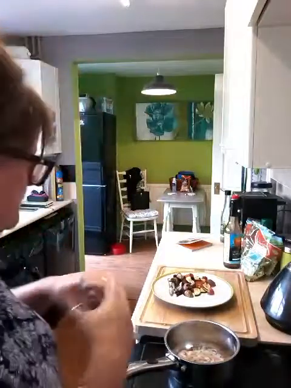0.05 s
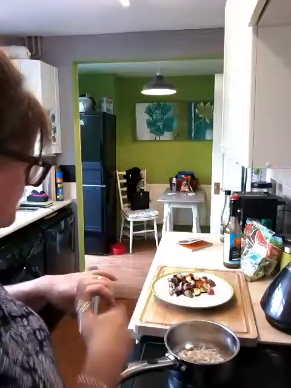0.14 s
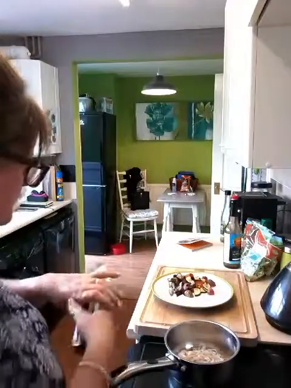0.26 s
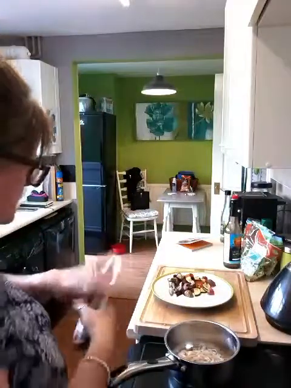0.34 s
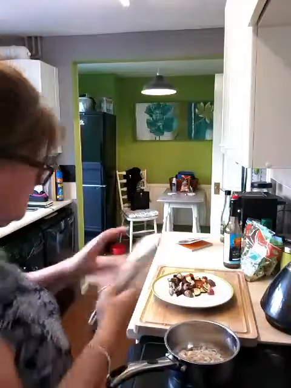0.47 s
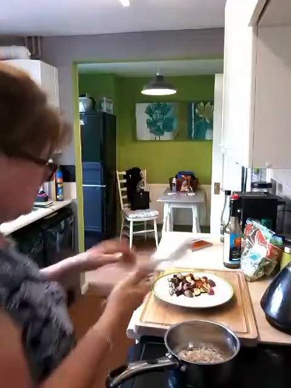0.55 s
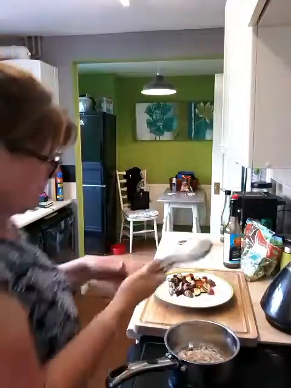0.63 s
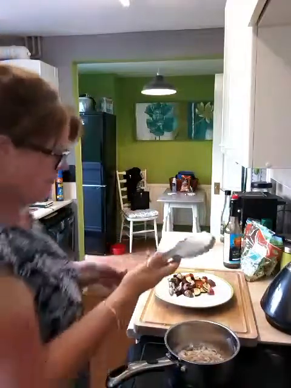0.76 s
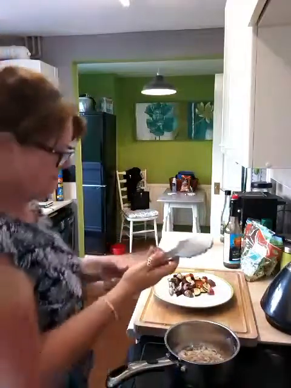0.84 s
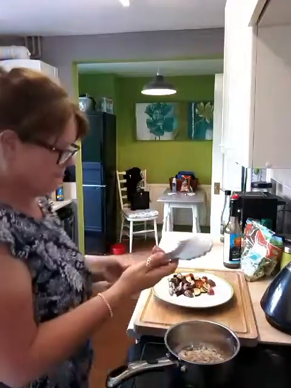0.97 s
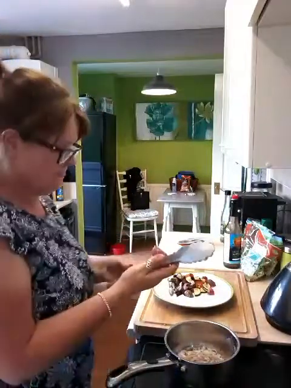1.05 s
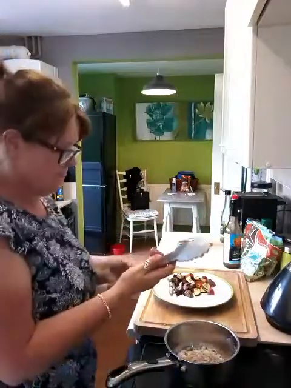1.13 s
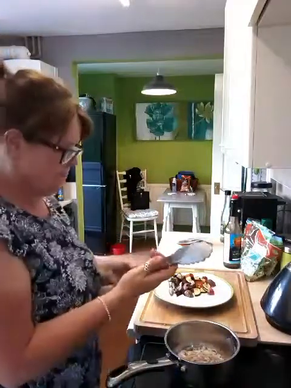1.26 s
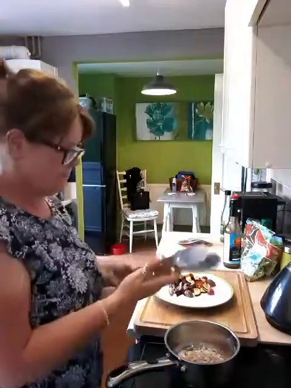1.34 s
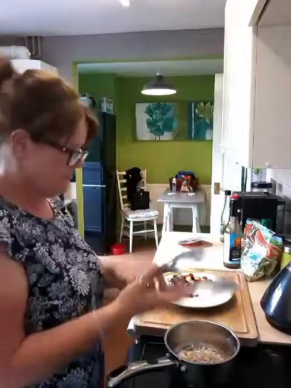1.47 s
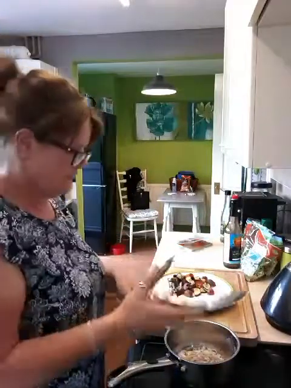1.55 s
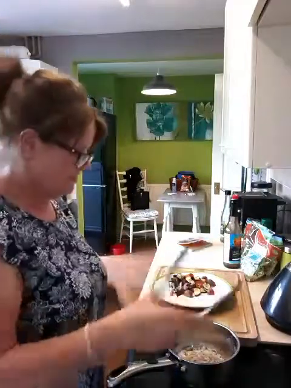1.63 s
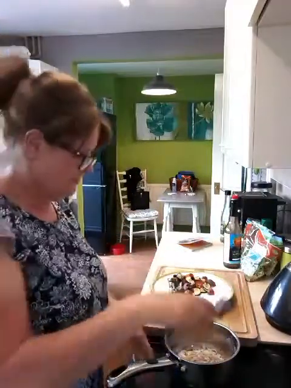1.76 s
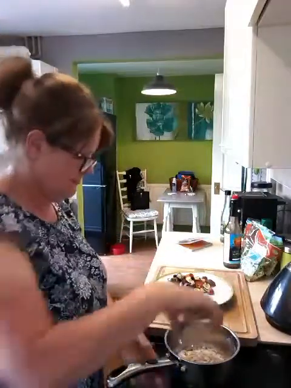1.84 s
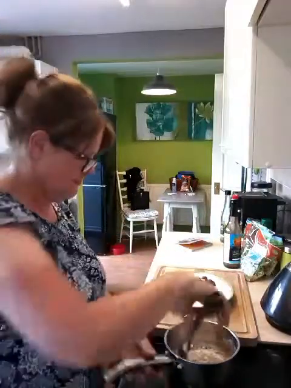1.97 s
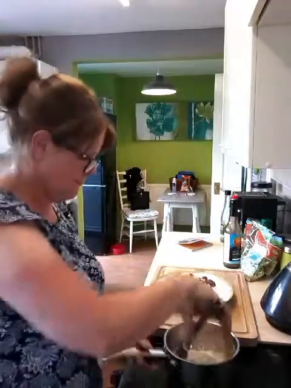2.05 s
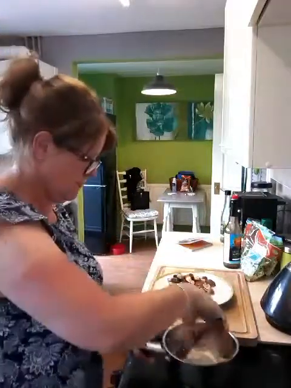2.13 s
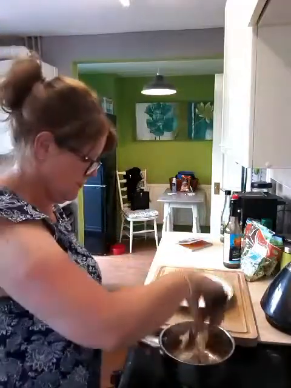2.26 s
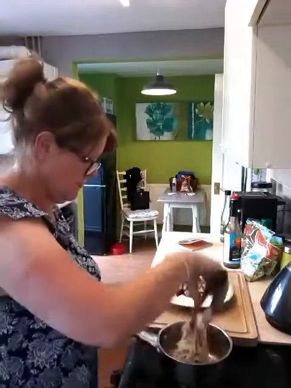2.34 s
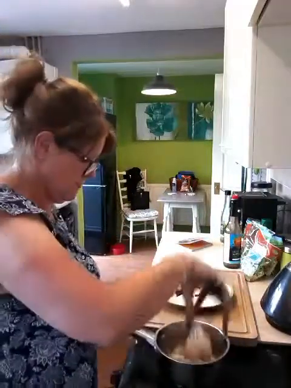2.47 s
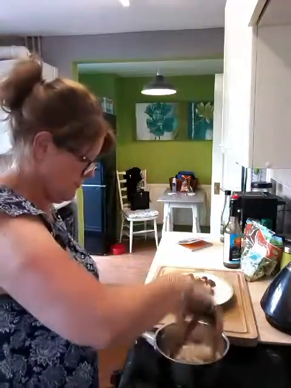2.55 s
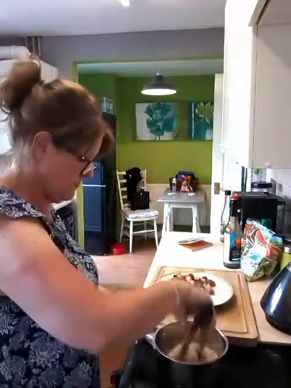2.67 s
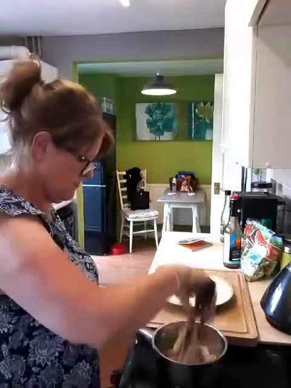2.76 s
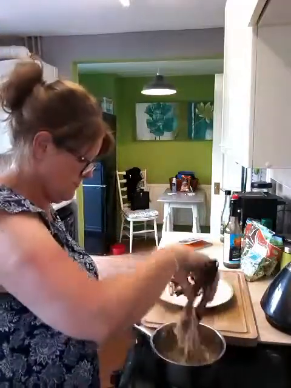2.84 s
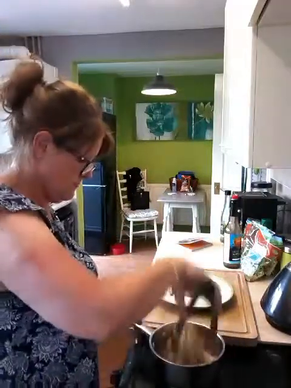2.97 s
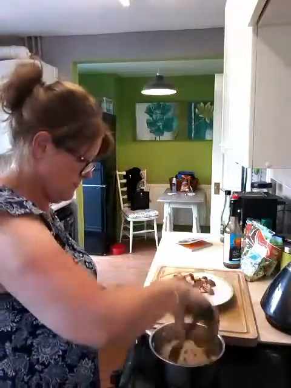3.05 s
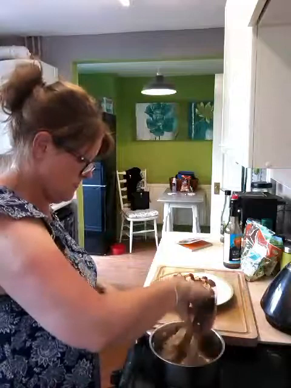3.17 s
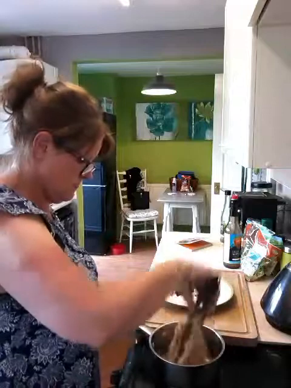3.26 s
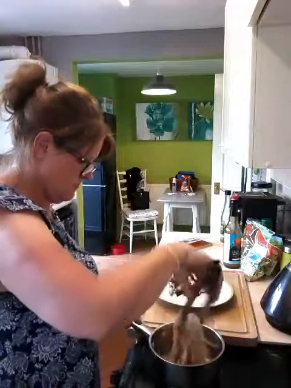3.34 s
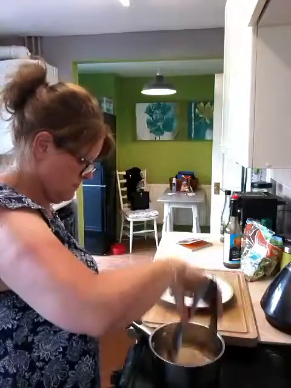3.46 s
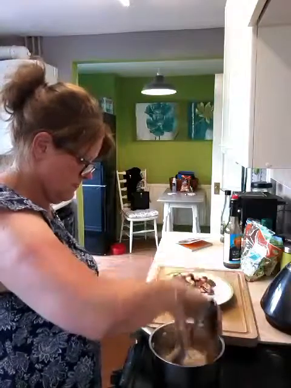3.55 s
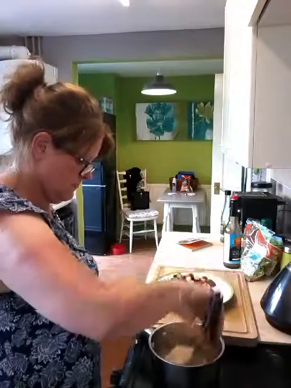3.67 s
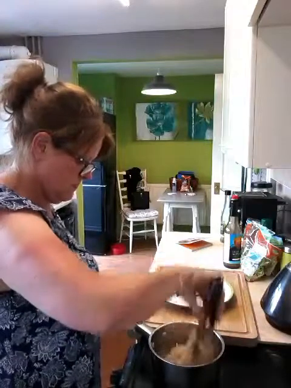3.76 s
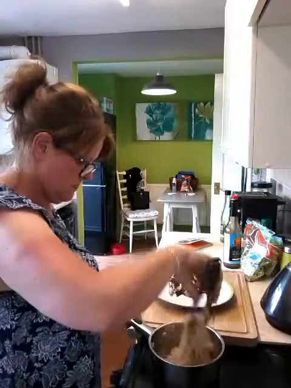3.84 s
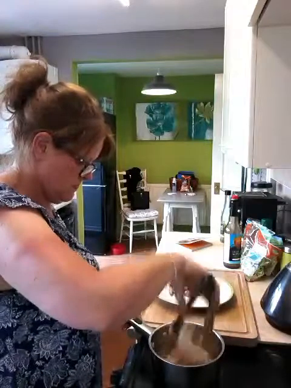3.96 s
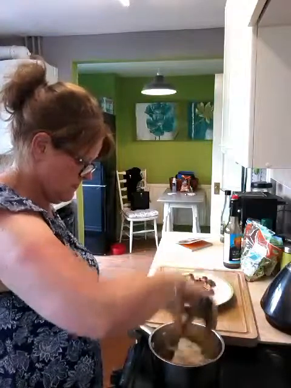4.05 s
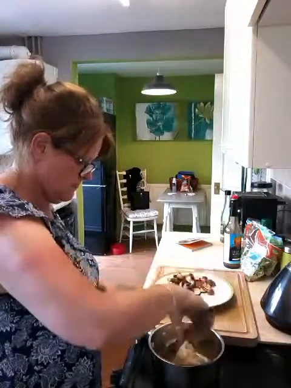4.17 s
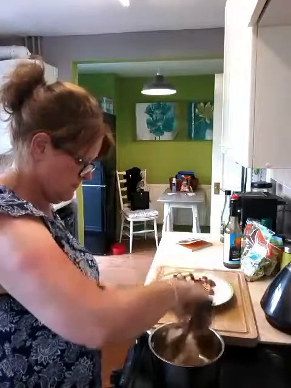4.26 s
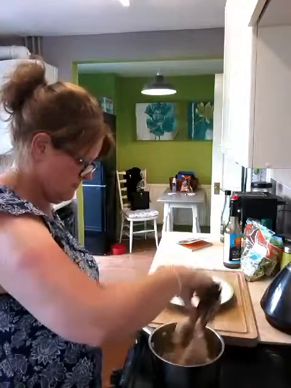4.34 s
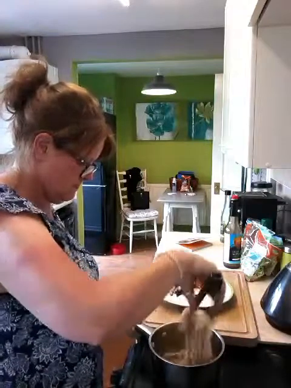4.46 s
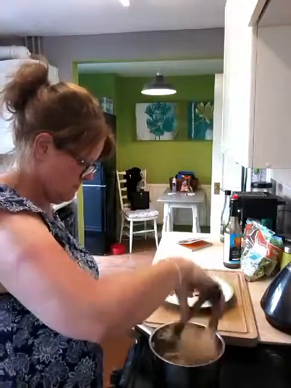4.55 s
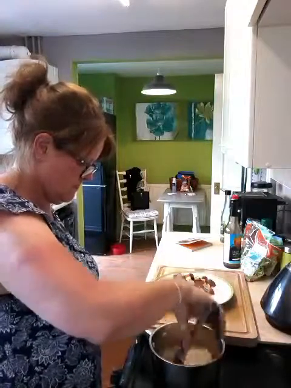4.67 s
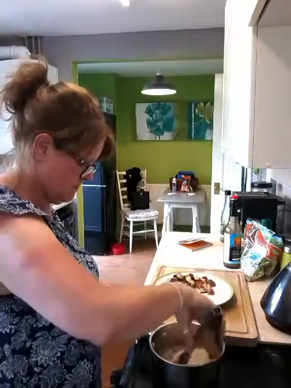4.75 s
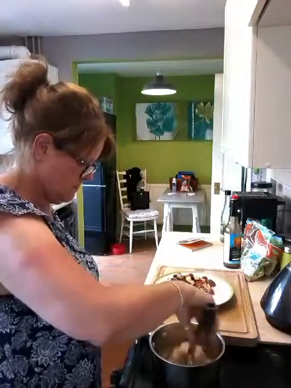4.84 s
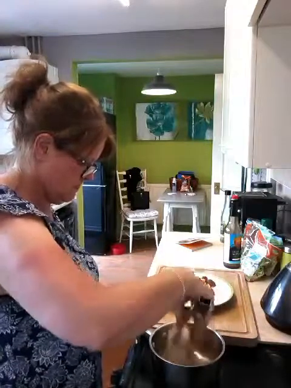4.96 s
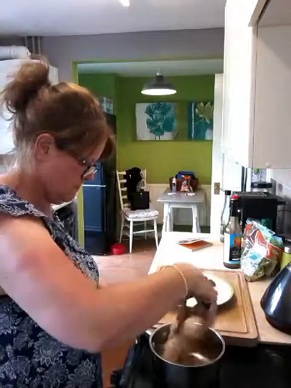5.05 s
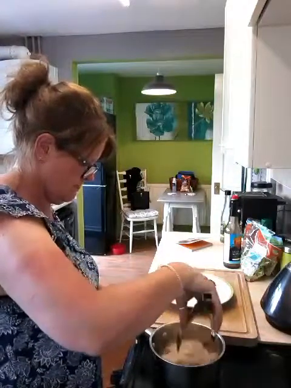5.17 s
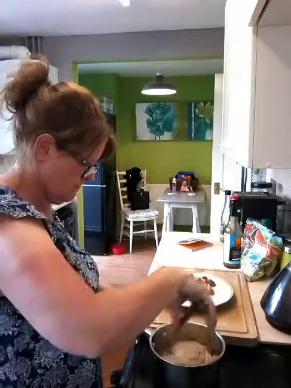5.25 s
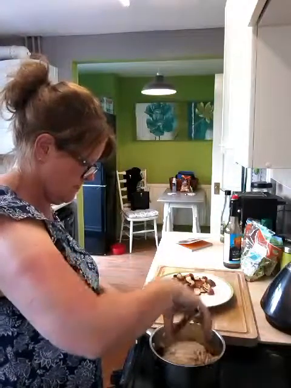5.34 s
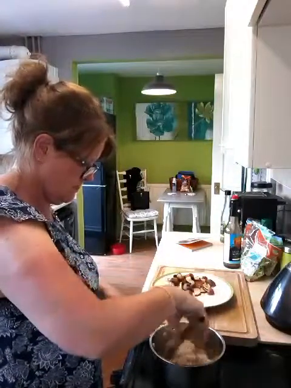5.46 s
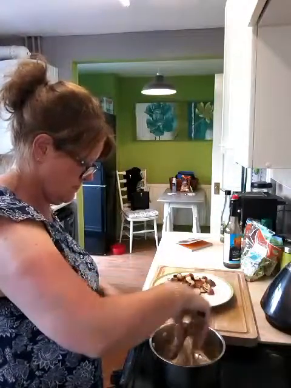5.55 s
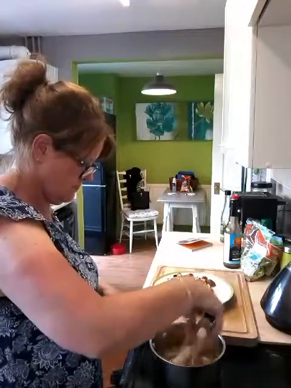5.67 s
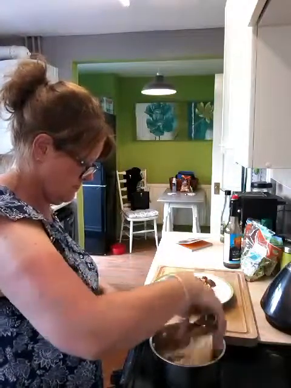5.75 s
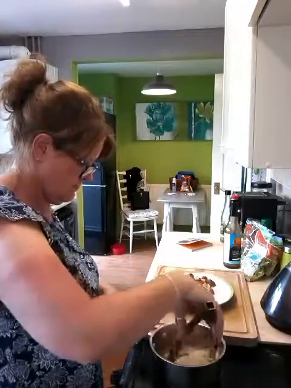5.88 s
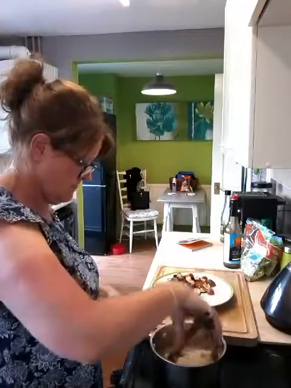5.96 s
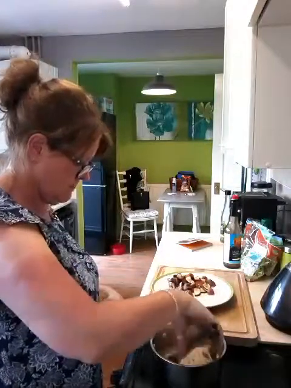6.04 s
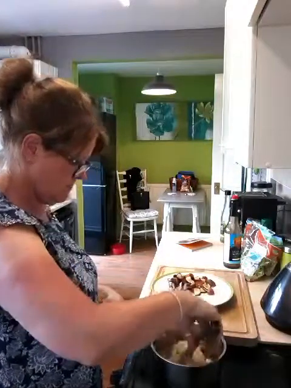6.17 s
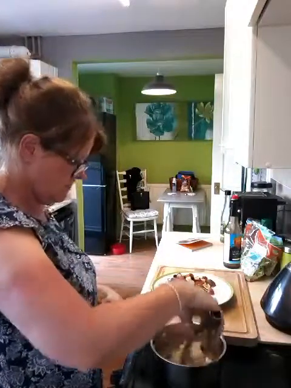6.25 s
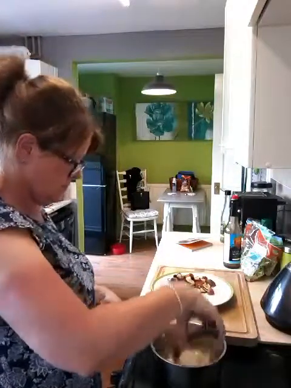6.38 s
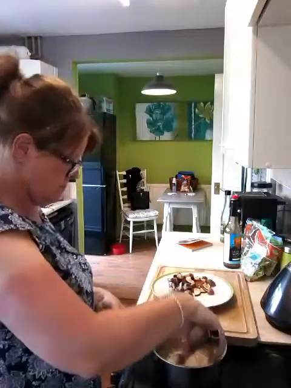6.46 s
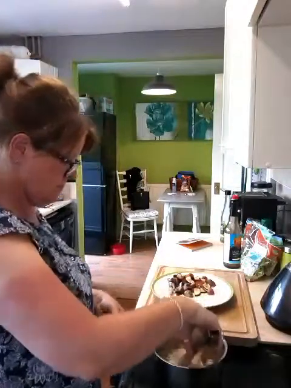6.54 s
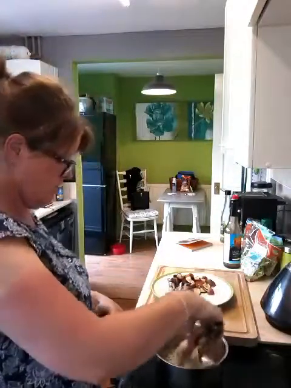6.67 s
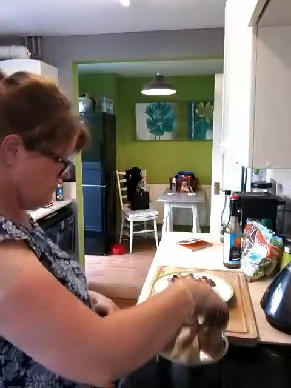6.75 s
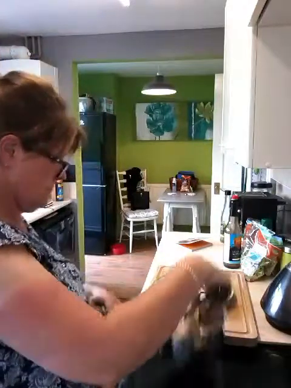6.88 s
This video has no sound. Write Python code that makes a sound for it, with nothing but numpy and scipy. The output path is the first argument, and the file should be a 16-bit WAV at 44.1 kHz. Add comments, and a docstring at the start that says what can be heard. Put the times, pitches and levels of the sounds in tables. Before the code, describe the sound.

A quiet, small, hard-surfaced kitchen is heard in mono from nearby, with still air and a barely audible low hum. From 0 to 1.9 seconds steel tongs are handled: a soft thud and tiny tick near 0.2, a clear springy click at 0.86, another pair around 1.13, fainter ticks later, and thin falling chirps. At 1.9 to 2.2 a wet crackle of noodles swells strongly and the tongs hit the saucepan with a bright clink and damped knock at 2.1. A tight clink-and-scrape cluster follows at 2.5 to 2.6, then single clinks near 3.1 and 4.1, with weak touches around 3.5. Several quick clinks come at 4.7, a ringing tap and light scrapes at 5.3 to 5.5, and faint chirps near 5.2. Another moist stir, soft bump and small scrape come at 6.0, then a final clink cluster at 6.4. Short echoes follow each touch.

```python
"""Steel tongs click in the hand, then clink, knock and scrape in a steel saucepan of wet noodles.
Each touch is a burst of tiny impacts that sets tongs, damped pan base and pan wall ringing.
The noodles are a crackle of tiny pops that swells with each stroke of the tongs; soft bumps are dull thuds.
A small hard kitchen answers with echoes, over still air, a faint mains hum and a few faint falling chirps."""
import sys
import numpy as np
from scipy import signal
from scipy.fft import rfft, irfft
from scipy.io import wavfile

SR = 44100
rng = np.random.default_rng(int(sys.argv[2]) if len(sys.argv) > 2 else 0)


def master_out(mix):
    """Clip the mix to full scale and print it as 16-bit PCM to the path in sys.argv[1]."""
    frames = np.transpose(np.atleast_2d(mix))
    ceiling = np.clip(frames, -1, 1)
    pcm = np.round(ceiling * 32767).astype(np.int16)
    wavfile.write(sys.argv[1], SR, pcm)


N = 304731
SIZE = 24000  # samples in one touch or echo pattern
BLOW = np.sqrt(0.02 * SR)  # turns an energy of one into a level of one held for 20 ms

# ringing of the pan wall: (pitch [Hz], relative level [dB], time to fall 60 dB [s])
WALL_RING = [(1912, 0, 0.17), (2010, -14, .05), (2100, -3, 0.06), (2020, -16, 0.085), (2363, -13, 0.09),
             (2400, -20, .07)]


def from_db(db):
    """Decibels to gain."""
    return 10 ** (np.asarray(db) / 20)


def unit(x):
    """Scale to an energy of one."""
    return x / np.sqrt(np.sum(x ** 2) + 1e-20)


def at_hz(points, hz):
    """Read a table between its points, along a log-frequency axis."""
    f, value = np.transpose(points)
    return np.interp(np.log(np.maximum(hz, 1)), np.log(f), value)


def colour(x, spectrum, size=4096):
    """Filter to the given spectrum, reacting as early as possible (minimum phase)."""
    hz = np.arange(size // 2 + 1) * SR / size
    cepstrum = irfft(np.log(from_db(at_hz(spectrum, hz))))
    # folding the second half onto the first puts the response after the impulse, never before
    cepstrum[1:size // 2] *= 2
    cepstrum[size // 2 + 1:] = 0
    response = irfft(np.exp(rfft(cepstrum)))
    return signal.fftconvolve(x, response)[:len(x)]


def dying(t60):
    """Envelope that falls 60 dB in t60 seconds."""
    return np.exp(-np.log(1000) * np.arange(SIZE) / SR / max(t60, 1e-4))


def add(out, s, sound):
    """Mix a sound in at a time in seconds."""
    i = max(round(s * SR), 0)
    out[i:i + len(sound)] += sound[:max(N - i, 0)]


def through(force, response):
    """A force drives a response; the result has an energy of one."""
    return unit(signal.fftconvolve(force, response)[:SIZE])


def ring(modes, scatter_db=3.0):
    """Decaying sines; each touch lands elsewhere and weights them anew."""
    out = np.zeros(SIZE)
    for hz, db, t60 in modes:
        length = min(int(max(t60, .005) * SR), SIZE)
        t = np.arange(length) / SR
        height = from_db(db + scatter_db * rng.standard_normal()) * rng.choice([-1, 1])
        decay = np.exp(-np.log(1000) * t / t60)
        out[:length] += height * decay * np.sin(2 * np.pi * hz * t)
    return unit(out)


def chatter(gap_s, rebound=0.63, count=5):
    """Metal on metal: each impact breaks into weaker rebounds (all-pass stages, so no colour is added)."""
    w = 2 * np.pi * np.arange(SIZE // 2 + 1) / SIZE  # radians per sample
    g = np.clip(rebound, .1, .85)
    gaps = gap_s * np.geomspace(.15, 1, count) * rng.uniform(.8, 1.2, count)
    force = 1
    for gap in gaps:
        delay = np.exp(-1j * w * max(round(gap * SR), 1))
        force = force * (delay - g) / (1 - g * delay)
    return irfft(force)


def diffuse_tail(build_s=0.0046):
    """Dense wall echoes build up quickly and die away, the lows lasting longest."""
    # how long echoes last: (frequency [Hz], time to fall 60 dB [s])
    echo_times = [(125, 0.62), (300, 0.38), (800, 0.38), (2000, 0.33), (6000, 0.3), (14000, .27)]
    white = rfft(rng.standard_normal(SIZE))
    hz = np.arange(SIZE // 2 + 1) * SR / SIZE
    tail = 0
    for centre, t60 in echo_times:
        # each band fades out where its neighbours fade in
        share = at_hz([(f, f == centre) for f, _ in echo_times], hz)
        tail = tail + irfft(white * share) * dying(t60)
    build = 1 - np.exp(-np.arange(SIZE) / SR / build_s)
    return unit(tail * build)


def kitchen(wet_db=0.5, near_db=-3.0, near_s=.005, walls_db=-5.0, walls_s=.04, count=8):
    """Echoes from one spot: direct sound, reflections off pan and worktop, single wall echoes, then the tail."""
    echoes = from_db(wet_db) * diffuse_tail()
    for db, spread_s in (near_db, near_s), (walls_db, walls_s):
        arrivals = (rng.uniform(.15, 1, count) * spread_s * SR).astype(int)
        echoes[arrivals] += from_db(db) * unit(rng.standard_normal(count))
    echoes[0] += 1
    return echoes


def background(floor_db=-66.5):
    """Still room air is coloured noise; an appliance hums at twice the mains rate and its octave."""
    # steady hum: (pitch [Hz], level [dB RMS])
    hum_tones = [(100, -70), (200, -87.5)]
    # colour of the room air: (frequency [Hz], relative level [dB per Hz])
    air_spectrum = [(12, -28.5), (20, -4), (48, -18), (70, -3.5), (113, -11), (234, -16), (698, -20.5),
                    (849, -18.5), (1000, -22), (1570, -24.5), (1860, -25), (3160, -25.5), (7520, -24),
                    (16000, -30)]
    t = np.arange(N) / SR
    hum = sum(from_db(db) * np.sqrt(2) * np.sin(2 * np.pi * hz * t) for hz, db in hum_tones)
    air = np.sqrt(N) * unit(colour(rng.standard_normal(N), air_spectrum))
    return hum + from_db(floor_db) * air


def stirring(attack_s=0.075, release_db_per_s=74):
    """Each stroke swells, holds while the tongs move and dies away as things settle; strokes add in power."""
    # strokes, sliding in the hand at first, then through noodles: (start [s], length [s], relative level [dB])
    strokes = [(-.02, 0.13, -58.5), (0.568, 0.33, -60), (1.023, 0.12, -54), (1.904, 0.11, -49.5),
               (1.988, 0.23, -42), (2.605, 0.22, -53.5), (3.8, .28, -69.5), (4.26, 0.32, -60),
               (4.92, 0.29, -61.5), (5.553, 0.2, -62), (5.984, 0.16, -50.5), (6.283, 0.5, -61)]
    t = np.arange(N) / SR
    power = 0
    for s, length, db in strokes:
        swell = np.clip((t - s) / attack_s, 0, 1)
        settled_db = db - release_db_per_s * np.maximum(t - s - length, 0)
        power = power + (swell * from_db(settled_db)) ** 2
    return np.sqrt(power)


def noodles(pops_per_s=3500, spread_db=5.0, level_db=-1.5, slide_db=-6.5):
    """Wet strands part in a fine crackle of tiny pops, and the sliding tongs sing faintly."""
    # colour of the wet crackle: (frequency [Hz], relative level [dB per Hz])
    wet_spectrum = [(88, -42), (150, -6), (190, -5), (494, -10), (821, -6), (905, -8.5), (1940, -9),
                    (2700, -11), (3700, -7.5), (4320, -8), (7180, -2), (16000, -31)]
    # colour of tongs sliding on steel: (frequency [Hz], relative level [dB per Hz])
    slide_spectrum = [(3000, -32), (6300, -14.5), (7050, -2.5), (7500, -1.5), (8300, -11), (9500, -27)]
    happens = rng.random(N) < pops_per_s / SR
    size_db = spread_db * np.minimum(rng.exponential(1, N), 4)  # mostly small pops, a few large
    pops = happens * rng.choice([-1, 1], N) * from_db(size_db)
    crackle = unit(colour(pops, wet_spectrum))
    slide = from_db(slide_db) * unit(colour(pops, slide_spectrum))
    moving = from_db(level_db) * stirring() * np.sqrt(N) * (crackle + slide)
    return signal.fftconvolve(moving, unit(kitchen()))[:N]


def chirps(fall_oct_per_s=1.8, width_hz=800, level_db=-1.0, room_db=1.0):
    """Thin, rough whistles glide down, heard mostly through the room; slow noise roughens each sine."""
    # faint high chirps: (start [s], length [s], starting pitch [Hz], relative level [dB])
    whistles = [(.13, 0.065, 5250, -61.5), (0.215, 0.069, 3830, -67), (0.989, 0.13, 4080, -67),
                (1.421, 0.094, 5200, -58), (1.508, 0.059, 3830, -68), (5.117, 0.073, 5020, -58),
                (5.233, .08, 5210, -55.5), (6.32, 0.12, 5100, -62)]
    out = np.zeros(N)
    t = np.arange(SIZE) / SR
    lowpass = signal.butter(2, width_hz / 2, fs=SR, output="sos")
    for s, length, hz, db in whistles:
        pitch = hz * 2 ** (-fall_oct_per_s * t)
        phase = 2 * np.pi * np.cumsum(pitch) / SR
        slow_noise = signal.sosfilt(lowpass, rng.standard_normal(SIZE))
        rough = np.sqrt(2 * SIZE) * unit(slow_noise)
        envelope = np.sin(np.pi * np.minimum(t / length, 1))
        add(out, s, from_db(db + level_db) * envelope * rough * np.sin(phase))
    return signal.fftconvolve(out, unit(kitchen(wet_db=room_db)))[:N]


def bumps():
    """Something soft is nudged as the tongs are moved: a dull thud and its echoes."""
    # soft bumps: (time [s], level over 20 ms [dB])
    nudges = [(.165, -56), (6.01, -58)]
    # colour of a bump: (frequency [Hz], relative level [dB per Hz])
    dull_spectrum = [(40, -4), (150, -3), (290, 1), (450, -20), (1500, -32), (6000, -43)]
    out = np.zeros(N)
    for s, db in nudges:
        add(out, s, BLOW * from_db(db) * unit(colour(kitchen(), dull_spectrum)))
    return out


def clicks(gap_s=.002, tick_db=-14.0, spring_db=-22.5, clack_db=-4.5):
    """Held in the hand the tongs rattle briefly and their spring rings."""
    # clicks of arms and spring: (time [s], bright tick relative level [dB], dull clack relative level [dB])
    touches = [(0.1936, -31.5, -59), (0.862, -14, -35.5), (1.1262, -25.5, -66), (1.149, -15.5, -53),
               (1.3985, -30.5, -67), (1.4096, -26.5, -61), (1.587, -38, -64), (1.85, -30.5, -62),
               (2.898, -35, -58), (2.9214, -25, -52), (3.392, -43.5, -73), (3.926, -41.5, -70.5),
               (4.5133, -28.5, -61.5), (5.161, -40.5, -63), (6.645, -40, -73)]
    # colour of the bright tick: (frequency [Hz], relative level [dB per Hz])
    tick_spectrum = [(300, -30.5), (3000, -31.5), (4500, -14), (5600, -8.5), (6800, -2), (8300, -2),
                     (9200, -9.5), (11000, -16), (15500, -25.5)]
    # colour of the dull clack: (frequency [Hz], relative level [dB per Hz])
    clack_spectrum = [(150, -19.5), (500, -15), (900, -4.5), (1400, -9.5), (2400, -12.5), (3700, 8.5),
                      (5000, 9), (8000, -10), (15000, -20)]
    # ringing of arms and spring: (pitch [Hz], relative level [dB], time to fall 60 dB [s])
    spring_modes = [(3700, -14, 0.054), (4800, -9, 0.092), (5580, -1, 0.066), (6150, -5, 0.043),
                    (6800, 0.5, .05), (7000, -5, 0.035), (7700, 2.5, .05), (8400, -2, .08),
                    (8300, 3.5, .08), (8150, -11.5, 0.046), (9970, -16, 0.085), (11400, -14.5, 0.068)]
    out = np.zeros(N)
    for s, bright_db, dull_db in touches:
        heard = through(chatter(gap_s), kitchen(wet_db=-1.0))
        tick = from_db(tick_db) * unit(colour(heard, tick_spectrum))
        spring = from_db(spring_db) * through(heard, ring(spring_modes))
        clack = from_db(clack_db) * unit(colour(heard, clack_spectrum))
        add(out, s, from_db(bright_db) * (tick + spring) + from_db(dull_db) * clack)
    return BLOW * out


def tongs(heard, pitch_hz, crowd_db=-14.5, ring_db=-22.0, favour_db=31.5):
    """A bright crowd of damped modes; the grip favours the long ones near one pitch (dB per octave away)."""
    # long ringing of the tongs: (pitch [Hz], relative level [dB], time to fall 60 dB [s])
    tong_modes = [(5490, -3.5, 0.14), (5900, -7, 0.068), (6300, -0.5, 0.099), (6400, -4.5, 0.088),
                  (7020, 1.5, 0.027), (7400, 8.5, 0.025), (8080, -8.5, 0.02), (7900, -4, 0.066),
                  (8050, -3.5, 0.11), (8700, -7.5, 0.075)]
    # colour of the crowd of brief modes: (frequency [Hz], relative level [dB per Hz])
    clink_spectrum = [(60, -61), (300, -46.5), (2000, -29), (4000, -18), (5200, -4.5), (6200, -4.5),
                      (7300, 6), (8300, -5.5), (9500, -10.5), (11500, -24), (15500, -32.5)]
    modes = []
    for hz, db, t60 in tong_modes:
        octaves_away = abs(np.log2(hz / pitch_hz))
        modes.append((hz, db - favour_db * octaves_away, t60))
    crowd = from_db(crowd_db) * unit(colour(heard, clink_spectrum))
    return crowd + from_db(ring_db) * through(heard, ring(modes))


def body(heard, ring_db=-4.5, t60=0.072, count=40):
    """The food-damped pan: a broad knock and many brief modes that depend on where it is hit."""
    # colour of the knock: (frequency [Hz], relative level [dB per Hz])
    knock_spectrum = [(30, -31.5), (90, -12.5), (190, -4.5), (370, -7), (460, 0.5), (540, -8), (780, -2),
                      (1150, -3.5), (1700, -1), (2500, -2), (3400, -0.5), (5000, 1.5), (9000, -4),
                      (15500, -26)]
    pitches = (np.arange(count) + rng.random(count)) / count * 5400 + 600  # 600 to 6000 Hz
    modes = [(hz, at_hz(knock_spectrum, hz), t60) for hz in pitches]
    knock = unit(colour(heard, knock_spectrum))
    return unit(knock + from_db(ring_db) * through(heard, ring(modes)))


def strikes(gap_s=.0007, room_db=1.35, body_db=-1.0, base_ring_db=-3.0, wall_ring_db=-5.5,
            hob_db=-29.6, hob_follows=0.58):
    """The tips land and settle within milliseconds; one force drives tongs, pan and the hob under it."""
    # tongs strike the pan; the spot they hit decides how much base and wall ring, levels are relative:
    # (time [s], clink [dB], knock [dB], base ring [dB], wall ring [dB], favoured tong pitch [Hz])
    hits = [(2.1205, -1, -14, -24.5, -33, 6760), (2.518, -12, -37, -39, -40, 6820),
            (2.528, -9, -37, -23.5, -36.5, 6510), (2.5968, 0, -16.5, -24.5, -45.5, 7400),
            (2.6147, -12, -24.5, -23.5, -40, 7700), (3.0723, -1, -20, -30.5, -30, 7360),
            (3.5038, -16, -40.5, -40, -41, 6800), (3.5844, -14.5, -28, -33.5, -55, 7400),
            (4.1087, 1, -16, -41, -31, 7350), (4.674, -9.5, -35.5, -34, -29, 8000),
            (4.7155, -5.5, -22, -25.5, -42, 8100), (4.7214, -6, -19.5, -31.5, -32.5, 7400),
            (4.768, -13.5, -54.5, -48, -45.5, 5400), (5.3174, -5, -30, -32, -22.5, 8500),
            (5.4664, -12.5, -53.5, -57, -58, 7420), (5.492, -30, -49, -47.5, -56, 7400),
            (6.033, -32.5, -50, -52, -47, 7400), (6.4128, -10, -35, -43, -35, 7300),
            (6.4208, -5, -44, -38, -36, 7440), (6.4437, -8.5, -30, -38.5, -36.5, 7400)]
    # ringing of the pan base: (pitch [Hz], relative level [dB], time to fall 60 dB [s])
    base_modes = [(458, -13, 0.14), (648, -3, .1), (662, -9.5, 0.074), (775, -4, .08), (819, -3, 0.11),
                  (888, -4, 0.12), (1358, -10.5, .1)]
    # the pan rocks on the hob: (pitch [Hz], relative level [dB], time to fall 60 dB [s])
    thump_modes = [(93, -11.5, 0.1), (193.5, 5, 0.25), (202, -9.5, 0.11), (290, -3, 0.39)]
    out = np.zeros(N)
    for s, clink_db, knock_db, base_db, wall_db, pitch_hz in hits:
        heard = through(chatter(gap_s), kitchen(wet_db=room_db))
        add(out, s, from_db(clink_db) * tongs(heard, pitch_hz))
        add(out, s, from_db(knock_db + body_db) * body(heard))
        add(out, s, from_db(base_db + base_ring_db) * through(heard, ring(base_modes)))
        add(out, s, from_db(wall_db + wall_ring_db) * through(heard, ring(WALL_RING)))
        thump_db = hob_db + hob_follows * knock_db  # a harder knock rocks the pan more
        add(out, s, from_db(thump_db) * through(heard, ring(thump_modes)))
    return BLOW * out


def scrapes(slips_per_s=500, gap_s=.0007, uneven_db=3.5, pitch_hz=7400, wall_ring_db=-1.0, count=40):
    """The tips stick and slip unevenly, harder and harder until they let go."""
    # the tips drag over the steel, levels are relative:
    # (start [s], length [s], clink [dB], rasp [dB], wall ring [dB])
    drags = [(2.523, 0.0094, -3, -39, -44), (2.537, 0.015, 1.5, -32, -18.5), (3.525, 0.0081, -18, -53, -46),
             (5.336, 0.027, -10.5, -34.5, -38), (5.438, .034, -16, -30.5, -48),
             (5.47, 0.017, -25, -36.5, -57), (6.071, 0.038, -11.5, -33.5, -47)]
    # colour of the pan under a dragging tip: (frequency [Hz], relative level [dB per Hz])
    rasp_spectrum = [(60, -27), (200, -11), (800, -9), (1200, -3), (2000, -3.5), (3800, 2.5), (5500, 7),
                     (9000, -12), (15500, -22.5)]
    out = np.zeros(N)
    for s, length, clink_db, rasp_db, wall_db in drags:
        when = np.cumsum(rng.uniform(.2, 1.8, count)) / slips_per_s
        growth = (when < length) * when / length
        strength = growth * from_db(uneven_db * rng.standard_normal(count))
        slips = np.bincount((when * SR).astype(int), strength, SIZE)[:SIZE]
        heard = through(through(slips, chatter(gap_s)), kitchen())
        add(out, s, from_db(clink_db) * tongs(heard, pitch_hz))
        add(out, s, from_db(rasp_db) * unit(colour(heard, rasp_spectrum)))
        add(out, s, from_db(wall_db + wall_ring_db) * through(heard, ring(WALL_RING)))
    return BLOW * out


def scene():
    """All the sounds add up in one channel."""
    mix = background() + noodles() + chirps() + bumps() + clicks() + strikes() + scrapes()
    return mix[None]


def record(dry, cutoff_hz=16000):
    """The hardest peaks are rounded and the top is cut."""
    rounded = 1.2 * np.tanh(dry / 1.2)
    lowpass = signal.ellip(10, .2, 80, cutoff_hz, fs=SR, output="sos")
    return signal.sosfilt(lowpass, rounded)


dry = scene()
out = record(dry)
master_out(out)
```